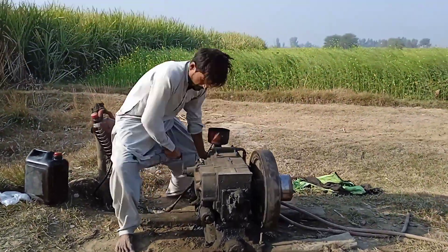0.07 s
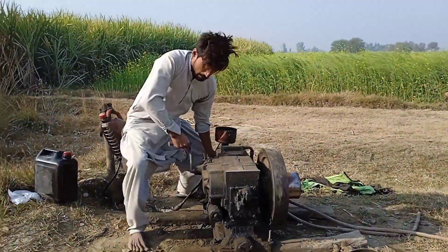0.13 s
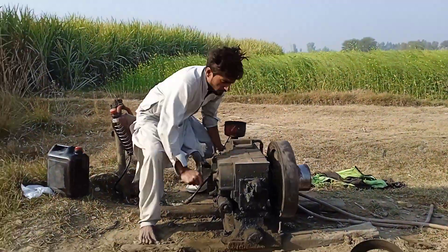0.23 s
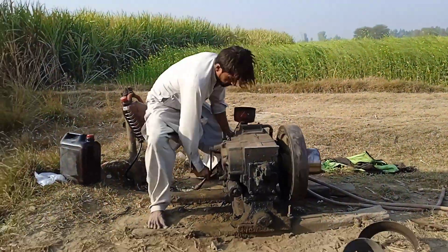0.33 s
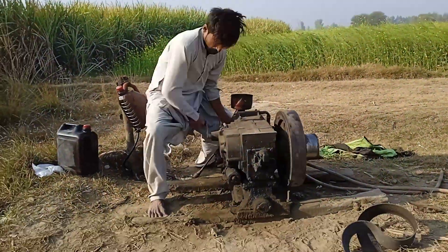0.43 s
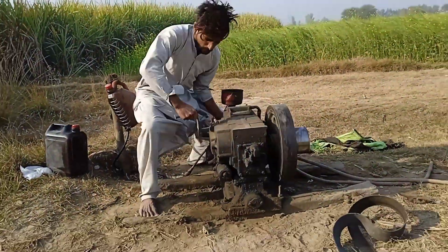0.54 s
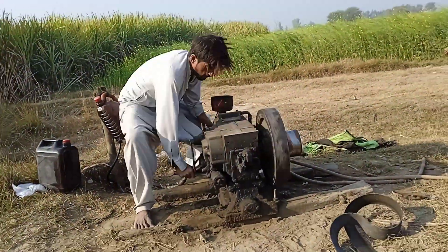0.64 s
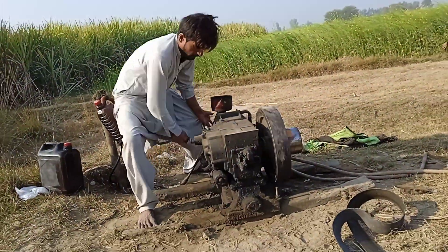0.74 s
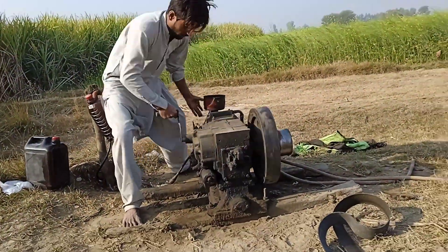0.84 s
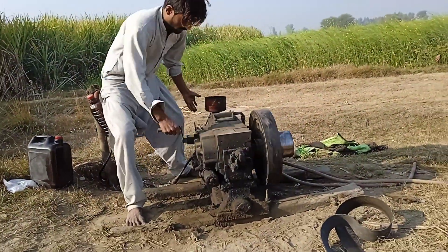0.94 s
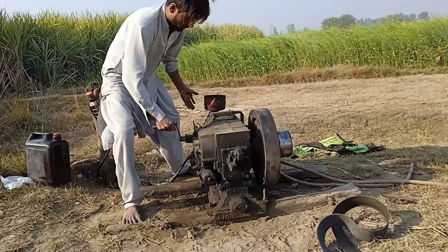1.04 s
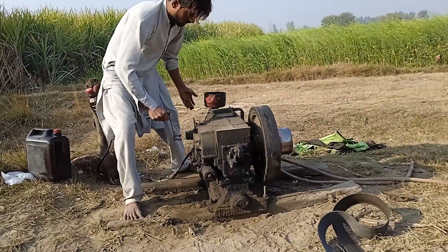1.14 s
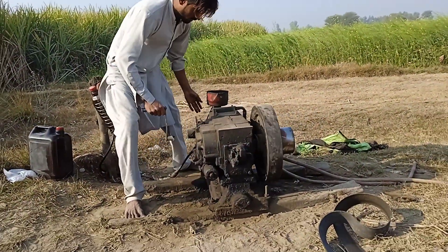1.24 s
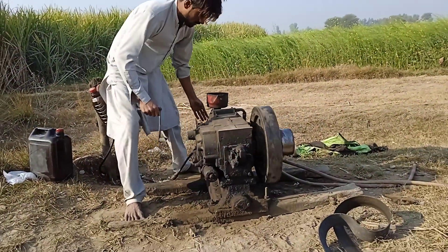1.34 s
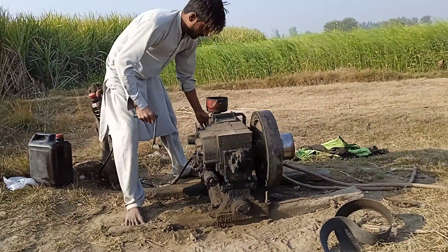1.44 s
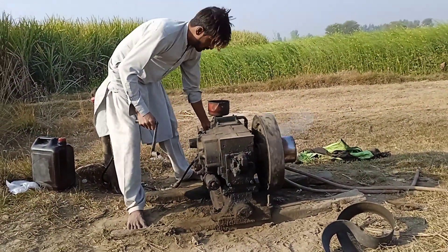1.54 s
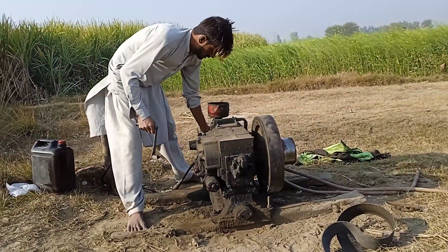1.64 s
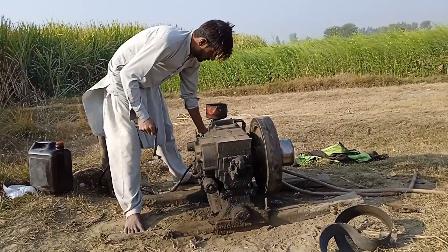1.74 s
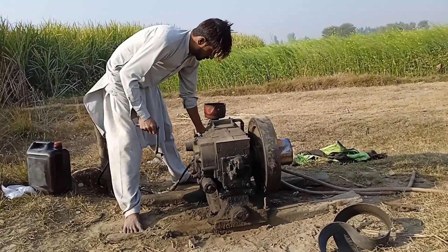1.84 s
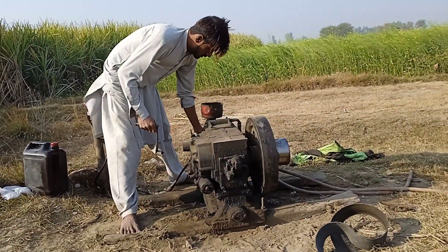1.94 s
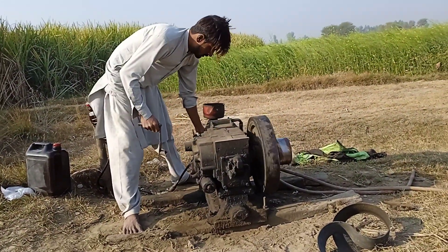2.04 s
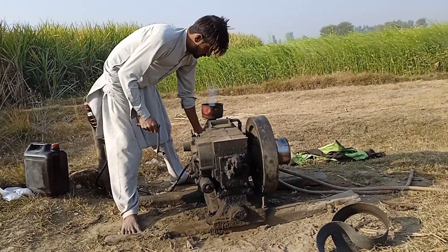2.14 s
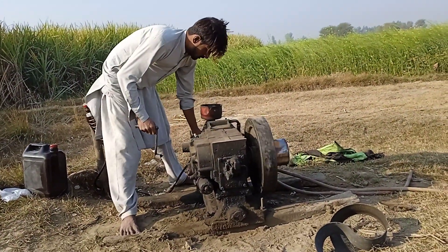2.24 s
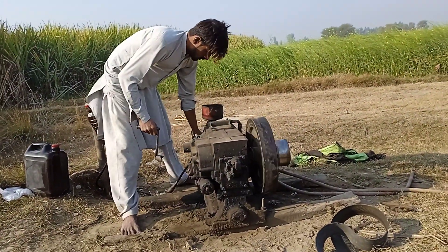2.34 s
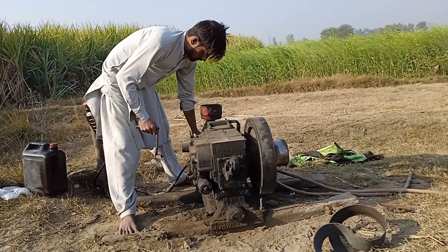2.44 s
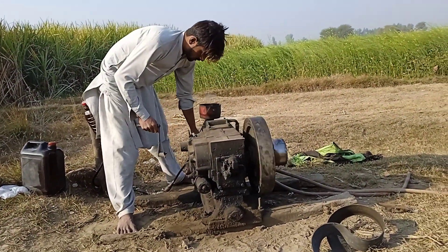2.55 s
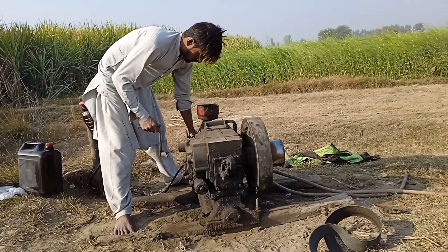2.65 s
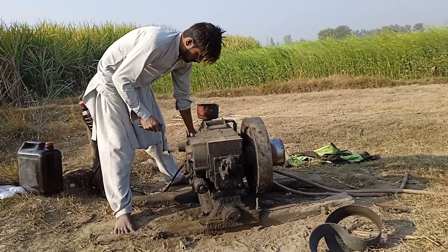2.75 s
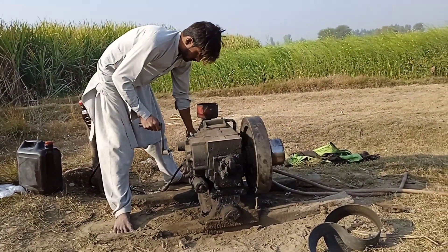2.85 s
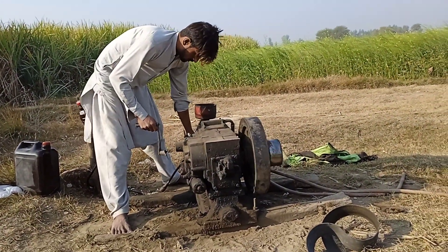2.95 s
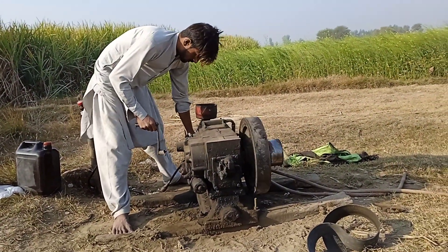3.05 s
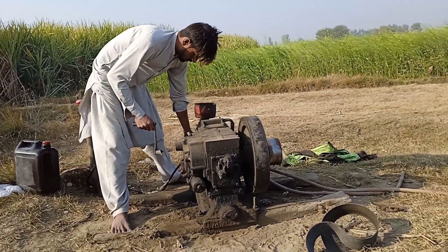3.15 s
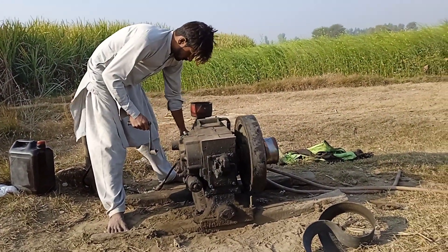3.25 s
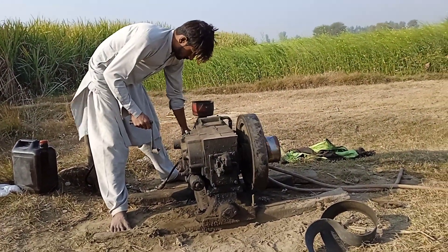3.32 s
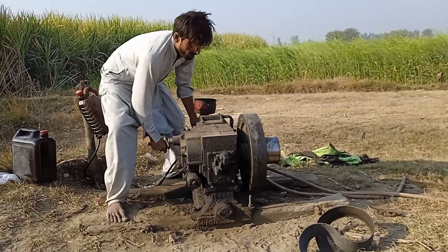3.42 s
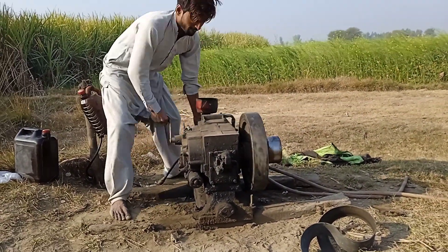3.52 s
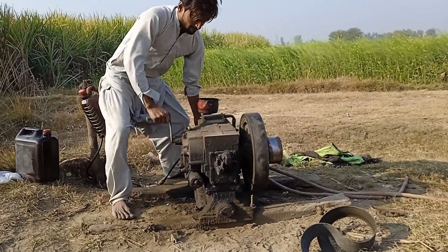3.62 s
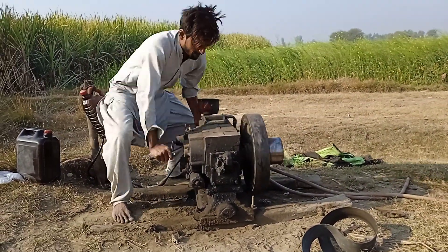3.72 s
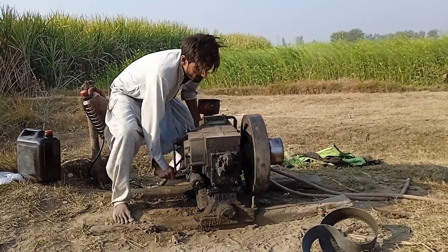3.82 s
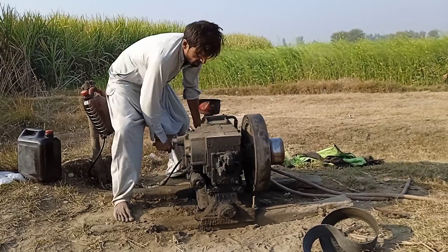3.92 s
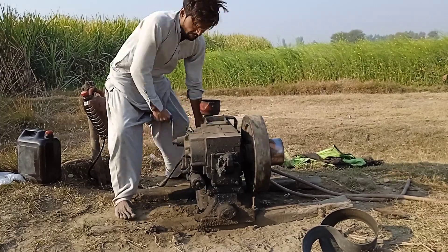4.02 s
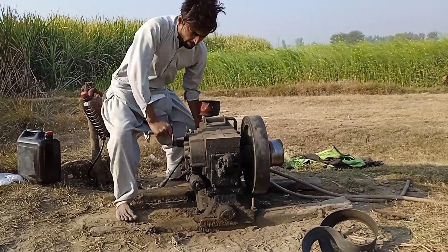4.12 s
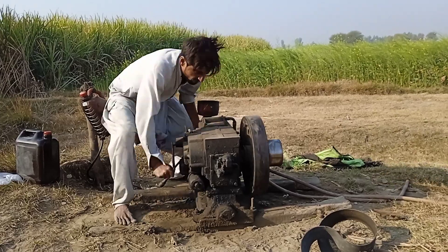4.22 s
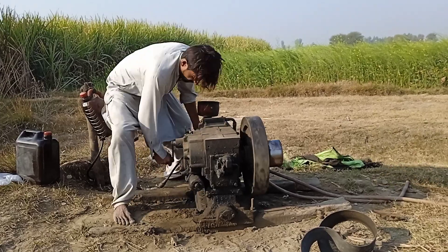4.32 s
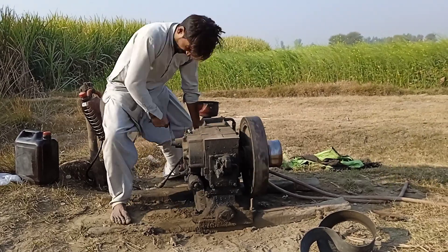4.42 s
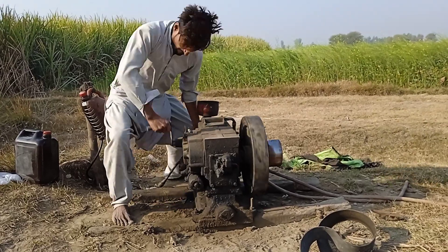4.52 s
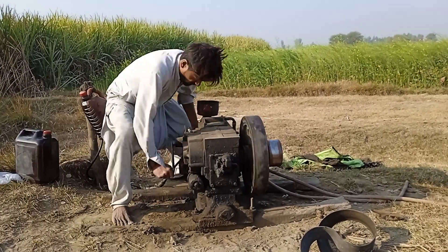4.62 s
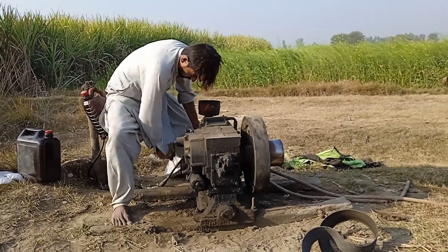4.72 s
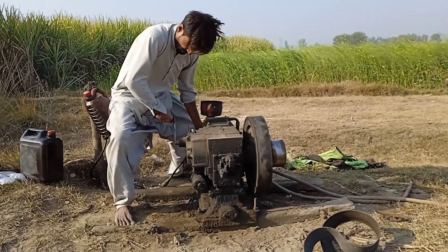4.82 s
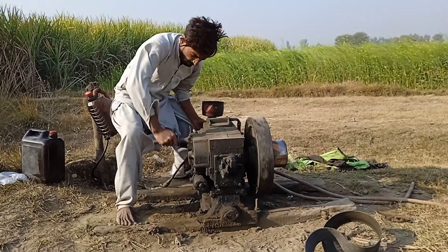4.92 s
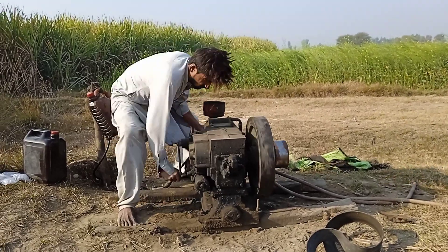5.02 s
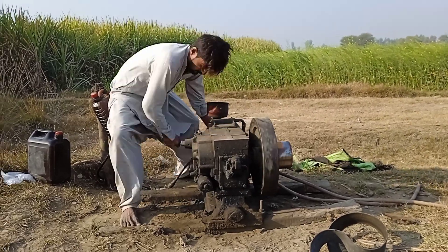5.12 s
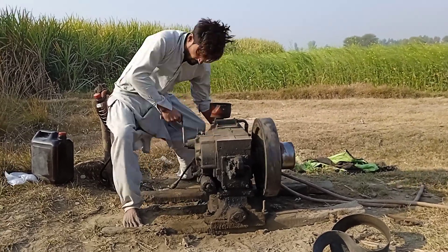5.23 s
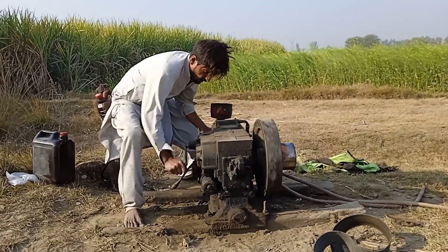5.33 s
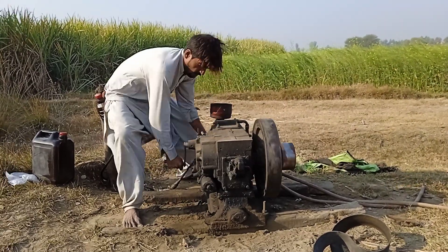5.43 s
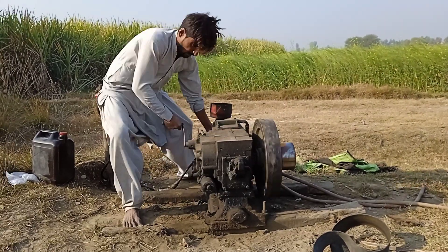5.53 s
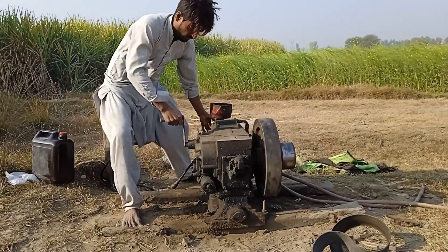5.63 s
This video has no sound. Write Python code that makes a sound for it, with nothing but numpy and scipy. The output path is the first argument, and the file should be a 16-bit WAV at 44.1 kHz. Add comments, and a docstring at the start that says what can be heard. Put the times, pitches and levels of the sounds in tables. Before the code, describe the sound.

Outdoors, dry and fairly close, a heavy single-cylinder engine is turned by hand without firing. It opens already moving: gear rumble, light iron clacks and a soft intake hiss, then a strong hollow air puff near 0.4 s and a double heavy knock at 0.6 s. The wheel coasts; from 0.75 s pawl clicks, sharp snaps and a dry grind appear, with a heavy knock and handle jangle at 1.05 s and another at 1.6 s. Clicks and low thuds thin out through 2.5 s. Two weak, breathy puffs at 2.6 and 2.8 s end in a faint clank and near-silence over faint field noise. At 3.3 s cranking restarts suddenly, clacks every tenth of a second or so, growing louder, with puffs at 3.7, 4.25 (strongest) and 4.7 s. Denser clatter follows from 5 s, with a thud, a heavy knock at 5.4 s and a brief jangle, continuing to the end near 5.7 s.

```python
"""Gears rumble and clack over a soft hiss: a single-cylinder diesel pump engine is turned by hand in an open
field, compression released, not firing. The crank pawl clicks, the loose handle jangles; on each turn the
piston pushes a puff of air past the open valve and draws a softer hiss back. The flywheel coasts to a halt,
rocks through two slow puffs, rests and is cranked again. Contacts are shaped noise bursts and decaying
modes that shake a resonant casting; air is filtered noise under flow envelopes."""
import sys
import numpy as np
from scipy import signal
from scipy.fft import rfft, irfft
from scipy.io import wavfile
from scipy.ndimage import uniform_filter1d

SR = 44100
rng = np.random.default_rng(int(sys.argv[2]) if len(sys.argv) > 2 else 0)


def wav_out(sig):
    """Save sig, one row per channel (or a flat mono array), as 16-bit PCM at SR to the path in sys.argv[1]."""
    wavfile.write(sys.argv[1], SR, np.round(np.clip(np.atleast_2d(sig).T, -1, 1) * 32767).astype(np.int16))


N = 250047

# Air pushed past the valve. Each row: peak time in seconds, relative level in dB, rise in seconds, fall in
# seconds, lowest port resonance in Hz, strongest port resonance in Hz, relative hiss in dB.
AIR_PUFFS = [(0.369, -32, 0.023, 0.015, 915, 2186, 1.5), (2.629, -42.5, 0.045, 0.025, 963, 2270, 5.5),
             (2.807, -54.5, 0.017, 0.024, 974, 2344, 3.5), (3.734, -37.5, 0.036, 0.014, 743, 2140, -2.5),
             (4.248, -29, 0.029, 0.015, 799, 2140, -7), (4.693, -35, 0.026, 0.016, 730, 2102, 0.5)]
# Heavy knocks through the block. Each row: time in seconds, relative level in dB, ring in Hz.
HEAVY_KNOCKS = [(0.594, -25, 935), (0.614, -21.5, 1010), (1.052, -21.5, 823), (1.605, -25, 2130),
                (5.381, -23, 1083)]
# Spectra of a light clack, a heavy knock, the pawl and the bearing rumble. Each row: frequency in Hz,
# relative density in dB per Hz.
CLACK_SPECTRUM = [(100, -26), (270, 0), (400, -23), (650, -0.5), (950, 5.5), (2200, 3), (2800, -3),
                  (3400, -14.5), (5500, -13.5), (8000, -29.5), (12000, -48)]
KNOCK_SPECTRUM = [(100, -5), (260, 5.5), (450, -1.5), (800, 10), (2200, -0.5), (3200, -12.5), (6000, -21),
                  (10000, -41), (16000, -51)]
PAWL_SPECTRUM = [(300, -10), (700, 5), (1400, 10.5), (2200, 9), (4300, -16), (6500, -6), (7200, -3),
                 (8000, -65), (14000, -25)]
RUMBLE_SPECTRUM = [(25, -20), (50, -35), (90, -9.5), (160, 4.5), (210, 0), (275, 4), (400, -16.5),
                   (500, -4), (750, -40.5)]
RESTART_S = 3.275  # cranking resumes


def from_db(db):
    """Decibels to gain."""
    return 10 ** (np.asarray(db) / 20)


def rms_one(x):
    """Scale to unit rms."""
    return x / np.sqrt(np.mean(x ** 2) + 1e-20)


def seconds(count=N):
    """A time axis in seconds."""
    return np.arange(count) / SR


def add(track, s, sound):
    """Mix a sound into a track from time s on."""
    at = max(int(s * SR), 0)
    track[at:at + len(sound)] += sound[:N - at]


def colour(x, points, ripple_db=0, size=2048):
    """Minimum-phase filter of unit power gain with the given spectrum; ripple adds chance peaks and dips."""
    hz, db = np.transpose(points)
    bins_hz = np.linspace(1, SR / 2, size // 2 + 1)
    ripple = np.sqrt(7) * uniform_filter1d(rng.standard_normal(len(bins_hz)), size=7)
    spectrum_db = np.interp(np.log(bins_hz), np.log(hz), db)
    gain = from_db(spectrum_db + ripple_db * np.minimum(ripple, 1))
    # folding the cepstrum makes the response causal
    cepstrum = irfft(np.log(gain))[:size // 2]
    cepstrum[0] = 0
    response = irfft(np.exp(rfft(2 * cepstrum, size)))
    return signal.oaconvolve(x, response / np.linalg.norm(response))[:len(x)]


def resonate(x, hz, width_hz):
    """One resonance with gain 1 on top."""
    r = np.exp(-np.pi * width_hz / SR)
    zeros = np.array([1, 0, -1]) * (1 - r * r) / 2
    poles = [1, -2 * r * np.cos(2 * np.pi * hz / SR), r * r]
    return signal.lfilter(zeros, poles, x + 1e-18)


def pipe_mode(x, hz, width_hz):
    """A resonance with steep flanks."""
    return resonate(resonate(x, hz, width_hz), hz, width_hz)


def ring(hz, t60):
    """One freely decaying mode, 60 dB down after t60 seconds."""
    t = seconds(count=16384)
    return np.sin(2 * np.pi * hz * t) * from_db(-60 * t / t60)


def drift(per_s):
    """A smooth random wander of spread 1."""
    knots = rng.standard_normal(4096)
    return rms_one(np.interp(seconds() * per_s, np.arange(len(knots)), knots))


def grains(per_s, spread_db):
    """Tiny random contacts of uneven size."""
    sizes = from_db(spread_db * np.minimum(rng.exponential(1, N), 4))
    signs = rng.choice([-1, 1], N)
    return rms_one(sizes * signs * (rng.random(N) < per_s / SR))


def contact(rise_s, t60, tail_db, tail_t60, count=8192):
    """A blow scatters through many dense modes: noise with a first decay and a second, tail decay."""
    t = seconds(count)
    decay = from_db(-60 * t / t60) + from_db(tail_db - 60 * t / tail_t60)
    return (1 - np.exp(-t / rise_s)) * decay * rng.standard_normal(count)


def at_level(sound, db, size=256):
    """Scale a blow so that its loudest few milliseconds have the given rms level."""
    return sound * from_db(db) / np.sqrt(uniform_filter1d(sound ** 2, size).max())


def blow(spectrum, db, hz, ring_db, ring_t60, rise_s, t60, tail_db):
    """Iron on iron: the point of contact decides which modes speak, and one of them rings on."""
    crack = colour(contact(rise_s, t60, tail_db, 0.18), spectrum, ripple_db=4.5)
    onset = 1 - np.exp(-seconds(len(crack)) / 0.001)
    mode = ring(hz, ring_t60)[:len(crack)] * onset
    return at_level(at_level(crack, db) + at_level(mode, db + ring_db), db)


def gear_db():
    """Gear noise follows the wheel's speed: down as it coasts, up as it is cranked."""
    # Each row of both: time in seconds, relative level in dB.
    coasting_levels = [(0.0, -47), (0.62, -46.5), (1.16, -55.5), (1.38, -59), (1.63, -56.5), (1.88, -62.5),
                       (2.49, -65), (2.59, -71), (2.7, -69)]
    cranking_levels = [(3.42, -57), (3.49, -55.5), (4.38, -48), (5.67, -50.5)]
    t = seconds()
    coasting = np.interp(t, *np.transpose(coasting_levels))
    cranking = np.interp(t, *np.transpose(cranking_levels))
    return np.where(t < RESTART_S, coasting, cranking)


def moving(halt_s=2.79, halt_fade_s=0.17, take_up_s=0.013):
    """1 while the wheel turns, 0 at rest: the gears die away slowly and take up the load at once."""
    t = seconds()
    return np.clip(np.maximum((halt_s - t) / halt_fade_s, (t - RESTART_S) / take_up_s), 0, 1)


def stalled(width_s=0.039):
    """1 at a dead centre, where the piston stands still and the gears go slack; 0 far from one."""
    # The slowing piston turns round. Each entry: time in seconds.
    dead_centres_s = [1.365, 1.68, 1.82, 1.97, 2.155, 2.375, 2.73, 2.93]
    dwell = sum(np.exp(-((seconds() - s) / width_s) ** 2) for s in dead_centres_s)
    return np.minimum(dwell, 1)


def open_field(level_db=-73):
    """Steady coloured noise: the faint noise of the field."""
    # Field spectrum. Each row: frequency in Hz, relative density in dB per Hz.
    field_spectrum = [(30, -18.5), (75, -2), (134, -14), (364, -27.5), (1900, -28), (3200, -40),
                      (8000, -45.5)]
    return from_db(level_db) * colour(rng.standard_normal(N), field_spectrum)


def piston(level_db=-76):
    """The piston rings hiss faintly in the bore; the hiss dips at the dead centres."""
    # Ring hiss spectrum. Each row: frequency in Hz, relative density in dB per Hz.
    hiss_spectrum = [(1900, -31), (2300, -15), (2750, -41), (5300, -34), (6550, -20), (7600, -47),
                     (13300, -34), (15000, -28)]
    return from_db(level_db) * (1 - stalled()) * colour(rng.standard_normal(N), hiss_spectrum)


def thud(db, hz, t60, swell_s=0.0048, rustle_db=-6, sag=0.017):
    """A few damped low cycles that sag in pitch, with some dull rustle of wood and soil."""
    t = seconds(count=8192)
    sagging_hz = hz * (1 + sag * (2 * np.exp(-4 * t / t60) - 1))
    phase = 2 * np.pi * np.cumsum(sagging_hz) / SR
    swing = np.sin(phase) * (1 - np.exp(-t / swell_s)) * from_db(-60 * t / t60)
    rustle = colour(contact(0.0023, t60, 9, 0.17), RUMBLE_SPECTRUM)
    return at_level(swing, db) + at_level(rustle, db + rustle_db)


def thuds(level_db=-2.0, lead_s=0.00499, knock_hz=168, knock_db=-12.5, knock_t60=0.022):
    """The bed rocks on its timbers by itself, and gives way just ahead of each heavy knock."""
    # Each row: start in seconds, relative level in dB, nominal pitch in Hz, swings until 60 dB down.
    bed_thuds = [(0.074, -43, 138, 5), (0.487, -40.5, 170, 16), (0.934, -36.5, 115, 8),
                 (1.31, -41.5, 103, 3.5), (1.384, -43, 330, 18), (1.451, -37, 116.6, 13.5),
                 (2.089, -41, 108, 20), (2.855, -48, 243, 11), (4.384, -45.5, 133, 5.5),
                 (4.821, -46, 134, 10), (5.267, -34, 117, 9), (5.614, -46.5, 101, 5.5)]
    out = np.zeros(N)
    for s, db, hz, swings in bed_thuds:
        add(out, s, thud(db + level_db, hz, swings / hz))
    for s, db, _ in HEAVY_KNOCKS:
        add(out, s - lead_s, thud(db + knock_db, knock_hz, knock_t60))
    return out


def intakes(level_db=3, earlier_puff_s=-0.072, delay_s=0.029, length_s=0.13):
    """After each puff the descending piston draws a soft hiss, the louder the faster the wheel turns."""
    # Intake spectrum. Each row: frequency in Hz, relative density in dB per Hz.
    intake_spectrum = [(150, 13.5), (400, -37), (800, -26), (2200, -1), (3200, -3.5), (5200, 7), (7700, -2),
                       (9500, -7), (13500, -7.5), (15300, 10.5)]
    t = seconds()
    # the wheel already turns: the scene opens on the intake after an earlier puff
    starts = np.array([earlier_puff_s] + [puff[0] for puff in AIR_PUFFS]) + delay_s
    flow = sum(np.sin(np.pi * np.clip((t - start) / length_s, 0, 1)) for start in starts)
    hiss = colour(rng.standard_normal(N), intake_spectrum, ripple_db=3.0)
    return moving() * from_db(gear_db() + level_db) * flow * hiss


def block(x):
    """The cast-iron casting rings on after whatever shakes it: parallel modes of alternating sign."""
    # Each row: mode in Hz, relative gain in dB, t60 in seconds.
    iron_modes = [(251.6, -13, 0.15), (497, 4.5, 0.67), (828.4, 0.5, 0.56), (976, -15, 0.4),
                  (1158, -17, 0.59), (1464, -1.5, 0.47)]
    out = np.zeros(N)
    for k, (hz, db, t60) in enumerate(iron_modes):
        out += (-1) ** k * from_db(db) * resonate(x, hz, np.log(1000) / (np.pi * t60))
    return out


def clanks(ring_db=-5):
    """A soft blow leaves two bending modes of the crank ringing."""
    # Each row: start in seconds, relative level in dB, lower mode in Hz, upper mode in Hz, t60 in seconds.
    crank_clanks = [(1.165, -42, 890, 1467, 0.23), (2.651, -45, 809, 1528, 0.15),
                    (2.855, -50, 766, 1354, 0.28)]
    out = np.zeros(N)
    for s, db, low_hz, high_hz, t60 in crank_clanks:
        add(out, s, blow(CLACK_SPECTRUM, db, high_hz, ring_db=-3.0, ring_t60=0.036,
                         rise_s=0.0014, t60=0.084, tail_db=-19))
        modes = ring(high_hz, t60) + .5 * ring(low_hz, t60)
        add(out, s, from_db(db + ring_db) * modes)
    return signal.sosfilt(signal.butter(4, 2300, fs=SR, output="sos"), out + 1e-18)


def rubs(level_db=-8, slips_per_s=500, ring_db=7):
    """Dry parts catch and grind: a short run of uneven slips that favours one resonance. The same short burst,
    set low in pitch, also gives a dull knock near 2.01 s."""
    # Each row: start in seconds, relative level in dB, length in seconds, ring in Hz. The low row at 2.012 s is
    # a dull knock rather than a grind.
    dry_grinds = [(0.814, -33, 0.038, 920), (1.301, -39, 0.046, 890), (1.379, -42, 0.014, 1120),
                  (2.012, -37, 0.039, 470), (2.279, -43.5, 0.045, 970), (3.689, -31, 0.028, 900),
                  (4.944, -33, 0.032, 810)]
    out = np.zeros(N)
    for s, db, length_s, hz in dry_grinds:
        slips = colour(grains(slips_per_s, 2.4), KNOCK_SPECTRUM, ripple_db=5)[:int(length_s * SR)]
        slips = slips + from_db(ring_db) * resonate(slips, hz, hz / 10)
        add(out, s, at_level(slips * signal.windows.tukey(len(slips)), db + level_db))
    return out


def jangles(level_db=-1, t60=0.17, width_hz=110, taps_per_s=600, scrape_db=-4):
    """After a hard jolt the loose handle buzzes on its shaft, in ever weaker taps."""
    # Each row: start in seconds, relative level in dB.
    handle_jangles = [(1.058, -38), (1.608, -43), (5.491, -44.5)]
    # Each entry: handle mode in Hz.
    handle_modes_hz = [1365, 1680, 2350, 2350, 3325, 4640, 5160]
    out, t = np.zeros(N), seconds(count=16384)
    for s, db in handle_jangles:
        taps = grains(taps_per_s, 1)[:len(t)] * from_db(-60 * t / t60)
        steel = sum(pipe_mode(taps, hz, width_hz) / hz for hz in handle_modes_hz)
        scrape = rms_one(colour(taps, PAWL_SPECTRUM))
        add(out, s, at_level(rms_one(steel) + from_db(scrape_db) * scrape, db + level_db))
    return out


def snaps(top_db=-5, body_db=-4):
    """Sharp snaps of the loose handle: hard, short contacts with a bright edge."""
    # Each row: time in seconds, relative level in dB, relative body in dB.
    handle_snaps = [(0.174, -41, 3.5), (0.5462, -40, 7), (0.714, -37, 1.5), (0.893, -53, 11),
                    (0.9221, -47, 6), (1.0287, -40.5, 9.5), (1.1635, -34.5, -2.5), (1.273, -46.5, 12),
                    (1.4428, -50, 2.5), (1.5754, -46, 6), (1.7527, -40, 3), (2.0769, -50, -3.5),
                    (2.258, -45, 1.5), (3.462, -44, 1.5), (4.0198, -42, 2), (4.072, -52, 14),
                    (4.4943, -42.5, 7), (4.8833, -54.5, 19), (4.9256, -40.5, 2), (5.359, -44, 10),
                    (5.4876, -35, 1.5)]
    # Edge spectrum. Each row: frequency in Hz, relative density in dB per Hz.
    edge_spectrum = [(1500, -37), (3500, -5), (5500, 12.5), (7500, -2.5), (9500, -6.5), (13500, -7.5),
                     (15300, 6.5), (16000, 4.5)]
    out = np.zeros(N)
    for s, db, dull_db in handle_snaps:
        edge = colour(contact(0.0015, 0.017, -46, 0.25), edge_spectrum, ripple_db=8.0)
        body = colour(contact(0.00083, 0.02, -7.0, 0.061), CLACK_SPECTRUM, ripple_db=5.5)
        add(out, s - .001, at_level(edge, db + top_db))
        add(out, s, at_level(body, db + dull_db + body_db))
    return out


def pawl(level_db=-8, lip_db=-19, chink_db=2, low_hz=1980, high_hz=3430, lip_lead_s=0.0076):
    """The pawl scrapes the lip of its notch, drops in and gives a short chink in two steel modes."""
    # Each row: time in seconds, relative level in dB, ring in Hz, relative chink in dB.
    pawl_clicks = [(0.7746, -40, 2050, -14), (0.9393, -35.5, 1940, -19), (1, -31, 1650, -28),
                   (1.1328, -30, 1660, -27), (1.2278, -43.5, 1860, -8.5), (1.5344, -33, 1280, -36),
                   (1.6204, -33.5, 1290, -16.5), (1.705, -32, 1290, -29), (1.832, -47, 1840, -6.5),
                   (1.8548, -44, 1510, -27), (2.2013, -33.5, 1870, -25), (2.2811, -42, 1350, -29),
                   (2.4322, -39.5, 2200, -25), (2.496, -37, 1410, -35)]
    out = np.zeros(N)
    for s, db, hz, ring_db in pawl_clicks:
        scrape = pipe_mode(contact(0.00071, 0.02, -24, .05), 2300, 1100)
        add(out, s - lip_lead_s, at_level(scrape, db + lip_db))
        add(out, s, blow(PAWL_SPECTRUM, db + level_db, hz, ring_db=-5.0, ring_t60=0.025,
                         rise_s=0.00041, t60=0.043, tail_db=-14.0))
        tap = contact(0.0003, 0.011, -17, 0.04)
        for mode_hz in (low_hz, high_hz):
            add(out, s, at_level(pipe_mode(tap, mode_hz, 127), db + ring_db + chink_db))
    return out


def puffs(level_db=0, jet_db=-6, low_db=2, low_width_hz=120, main_width_hz=150,
          build=1.62, glide=0.036, main_db=3, damping=0.18):
    """Pressure builds behind the valve and collapses; the jet hisses and sounds the port."""
    # Fixed port resonances. Each row: frequency in Hz, width in Hz, relative gain in dB.
    port_modes = [(260, 130, -13), (640, 260, -11), (1550, 110, -2), (2500, 200, -13), (2820, 90, -9),
                  (3320, 170, -13), (4220, 150, -10), (4680, 200, -12), (4990, 160, -11), (5400, 170, -10),
                  (7680, 150, -18)]
    # Jet hiss spectrum. Each row: frequency in Hz, relative density in dB per Hz.
    jet_spectrum = [(2000, -6.5), (3900, -2), (4500, 1.5), (5900, 5), (7500, -6), (9500, -9), (13500, -7.5),
                    (15200, 6.5), (16000, -22.5)]
    out, t = np.zeros(N), seconds()
    jet = rng.standard_normal(N)
    port = sum(from_db(db) * pipe_mode(jet, hz, width) for hz, width, db in port_modes)
    hiss = colour(rng.standard_normal(N), jet_spectrum)
    for s, db, rise_s, fall_s, low_hz, main_hz, hiss_db in AIR_PUFFS:
        building = np.abs((t - s) / rise_s) ** build
        collapsing = ((t - s) / fall_s) ** 2
        flow = np.exp(-np.where(t < s, building, collapsing))
        # a gentle jet damps the port less, so its modes stand out more sharply
        loss = from_db(damping * (db - AIR_PUFFS[0][1]))
        # the lowest mode rises as the piston shrinks the space behind the valve
        warped = t + glide * (t - s) ** 2 / (2 * rise_s)
        low = np.interp(warped, t, pipe_mode(jet, low_hz, low_width_hz * loss))
        main = pipe_mode(jet, main_hz, main_width_hz * loss)
        # the thinner and more hissing the jet, the less it drives the lowest mode
        modes = from_db(low_db - hiss_db / 2) * low + from_db(main_db) * main
        hollow = rms_one(port + modes / loss)
        out += from_db(db + level_db) * flow * (hollow + from_db(jet_db + hiss_db) * hiss)
    return out


def gears(mesh_db=-1, contacts_per_s=48, grain_db=3, cycles=15, wash_db=-6, slack=0.35, count=24,
          rumble_db=-59, rumble_follows=0.66):
    """Each tooth contact rings briefly at its own pitch, over a wash of rubbing and bearing rumble."""
    # Mesh spectrum. Each row: frequency in Hz, relative density in dB per Hz.
    mesh_spectrum = [(300, -21.5), (600, -3.5), (820, 12.5), (1100, 8), (1700, 0.5), (2200, 2),
                     (3200, -14.5), (6500, -15.5), (8500, -46)]
    level_db = gear_db()
    rumble = rms_one(colour(grains(1500, 2.8), RUMBLE_SPECTRUM) * from_db(2 * drift(30)))
    grit = np.zeros(N)
    for hz in np.geomspace(550, 3000, count):
        teeth = resonate(grains(contacts_per_s, grain_db), hz, hz / cycles)
        grit += rms_one(teeth) * np.sqrt(hz)
    wash = colour(rng.standard_normal(N), mesh_spectrum) * from_db(2 * drift(50))
    mesh = rms_one(rms_one(colour(grit, mesh_spectrum)) + from_db(wash_db) * wash)
    load = moving() * (1 - slack * stalled())
    # the rumble takes only a share of the gears' level swing
    rumble_level_db = rumble_db + rumble_follows * (level_db - level_db.mean())
    return load * (rumble * from_db(rumble_level_db) + mesh * from_db(level_db + mesh_db))


def clatter(clack_db=-8.0, knock_db=-8, bounce_db=-15, bounce_s=0.007, touch_db=-17, touch_lead_s=0.0047):
    """Light clacks of backlash, each bouncing once, and a few heavy knocks, each led by a first touch."""
    # Backlash in gears and tappets. Each row: time in seconds, relative level in dB, ring in Hz.
    backlash_clacks = [(0.133, -30.5, 1100), (0.196, -33, 2020), (0.268, -30, 980), (0.678, -29.5, 1076),
                       (0.736, -34, 1040), (0.799, -34.5, 870), (1.19, -37, 856), (1.412, -42.5, 1990),
                       (1.787, -38, 820), (2.067, -40, 1020), (3.308, -36.5, 2110), (3.401, -33.5, 1004),
                       (3.492, -34.5, 790), (3.591, -31.5, 822), (3.775, -37, 740), (3.894, -37, 1630),
                       (3.971, -35, 937), (4.045, -29.5, 2190), (4.127, -34, 995), (4.447, -31, 970),
                       (4.52, -30, 2093), (4.592, -29, 1000), (5.016, -27.5, 1616), (5.076, -33, 1500),
                       (5.106, -36, 1450), (5.134, -38, 1930), (5.16, -28.5, 815), (5.227, -31, 1414),
                       (5.317, -35.5, 1020), (5.449, -35, 1000), (5.554, -34.5, 2100), (5.606, -35.5, 895),
                       (5.652, -32, 2030)]
    out = np.zeros(N)
    for s, db, hz in backlash_clacks:
        bounce_delay_s = bounce_s * rng.uniform(0.4975, 1)
        for delay_s, level_db in ((0, clack_db), (bounce_delay_s, bounce_db)):
            add(out, s + delay_s, blow(CLACK_SPECTRUM, db + level_db, hz, ring_db=-1.5, ring_t60=0.039,
                                       rise_s=0.00017, t60=0.027, tail_db=-29))
    for s, db, hz in HEAVY_KNOCKS:
        for lead_s, level_db in ((touch_lead_s, touch_db), (0, knock_db)):
            add(out, s - lead_s, blow(KNOCK_SPECTRUM, db + level_db, hz, ring_db=0, ring_t60=0.031,
                                      rise_s=0.0032, t60=0.033, tail_db=-22.5))
    return out


def scene(ring_db=4, air_drive_db=-7):
    """Contacts and, more weakly, puffs shake the block; clanks, thuds, hisses and field noise are added."""
    iron = clatter() + pawl() + snaps() + gears() + rubs() + jangles()
    air = puffs()
    casting = from_db(ring_db) * block(iron + from_db(air_drive_db) * air)
    mix = iron + casting + clanks() + thuds() + air + intakes() + piston() + open_field()
    return mix[None]


def record(dry, low_cut_hz=55, cutoff_hz=16000):
    """The deep bass is thinned and the top is cut."""
    thin = signal.sosfilt(signal.butter(4, low_cut_hz, "high", fs=SR, output="sos"), dry)
    return signal.sosfilt(signal.ellip(10, .3, 80, cutoff_hz, fs=SR, output="sos"), thin)


dry = scene()
out = record(dry)
wav_out(out)
```